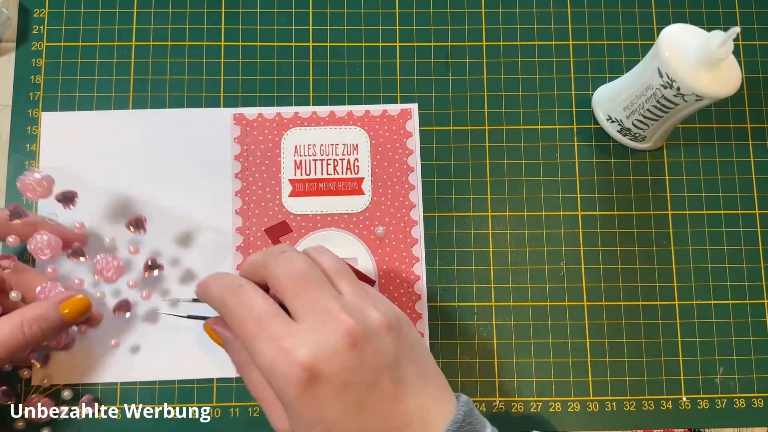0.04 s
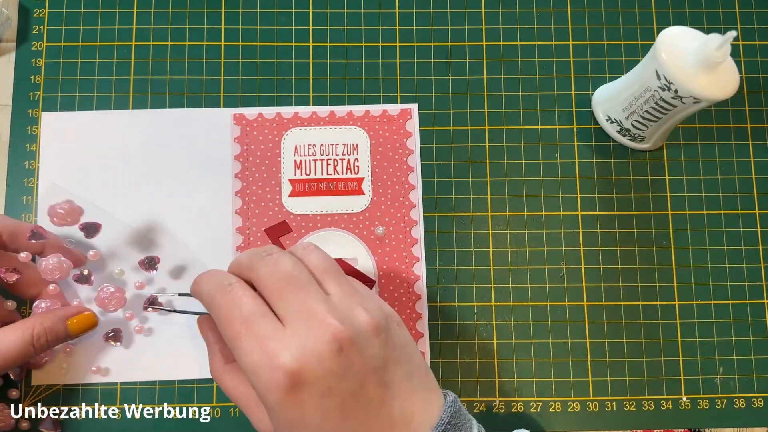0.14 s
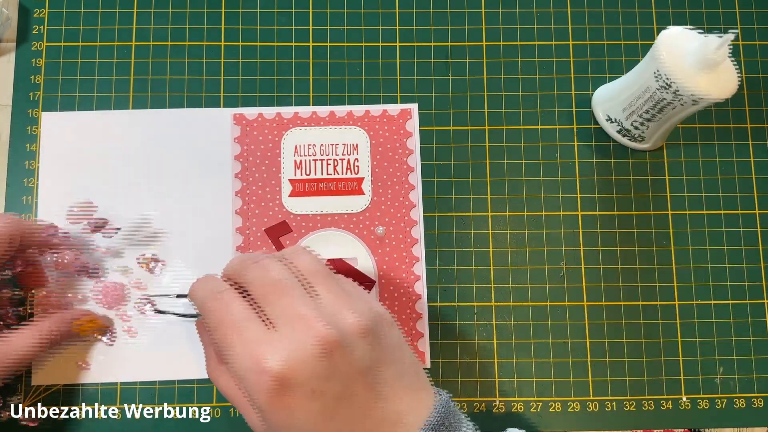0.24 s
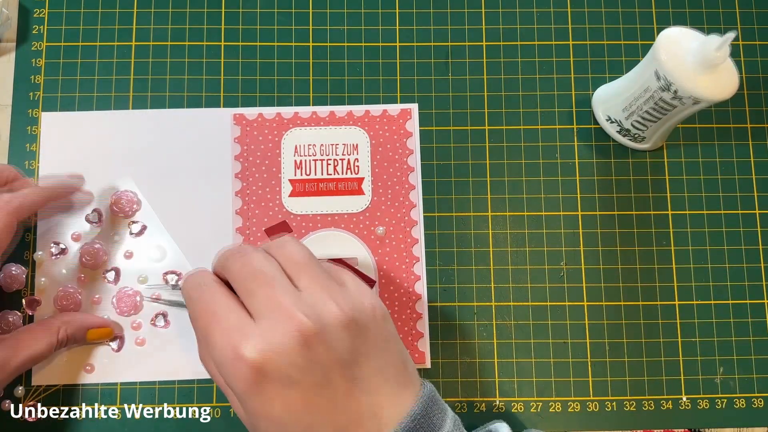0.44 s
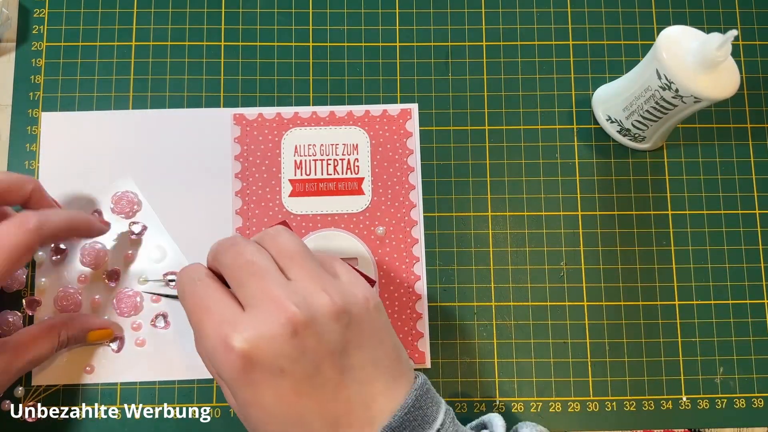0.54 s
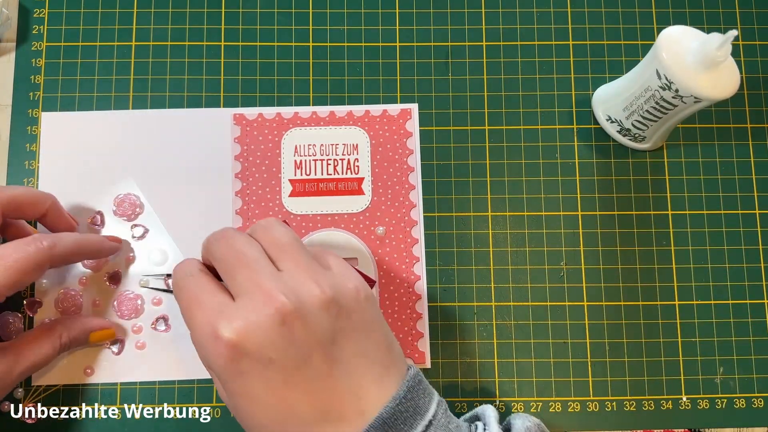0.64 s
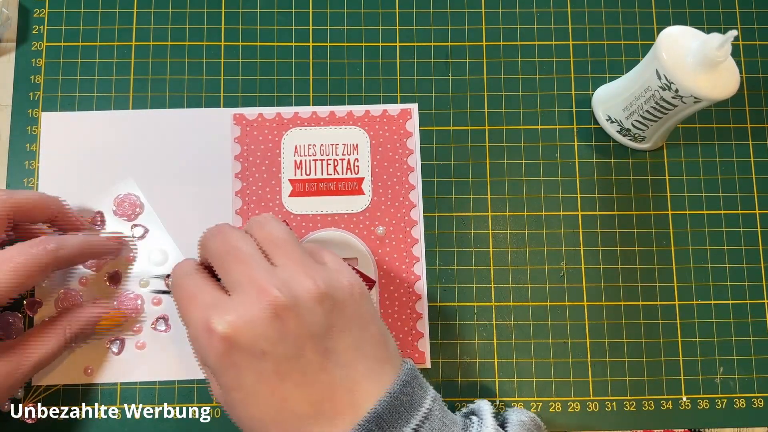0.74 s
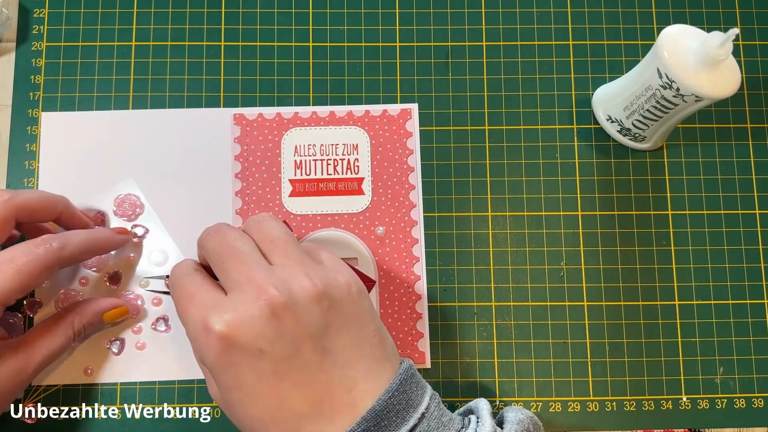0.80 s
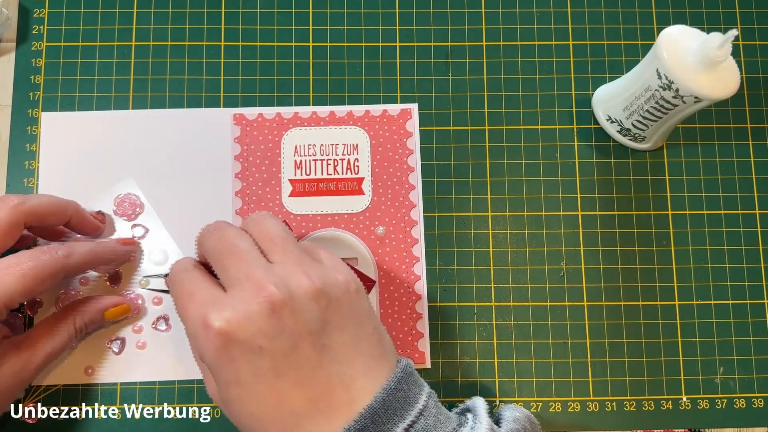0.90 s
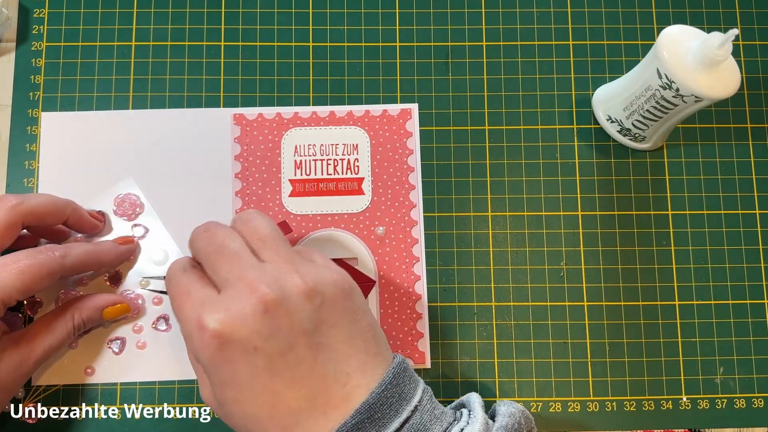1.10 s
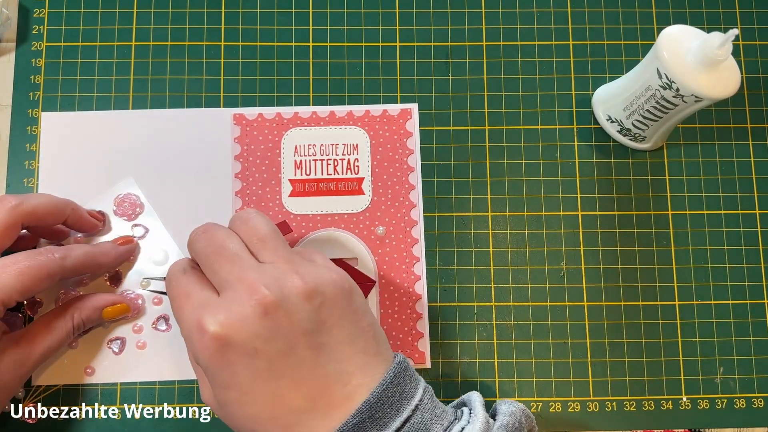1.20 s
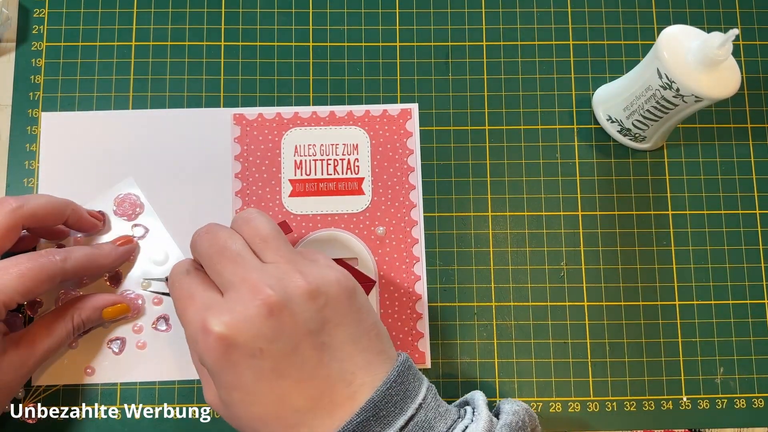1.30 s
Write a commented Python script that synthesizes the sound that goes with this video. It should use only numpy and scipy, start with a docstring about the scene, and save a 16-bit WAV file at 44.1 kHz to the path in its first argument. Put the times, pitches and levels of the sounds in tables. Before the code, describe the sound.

Stiff plastic sheet rattles, pops sharply and slaps down on a card, then near quiet

```python
"""A swish opens: a stiff plastic sheet of adhesive gems slides over a card, as slips with a rattle and hiss.
It buckles with hollow pops (crunch, ringing modes, low thump) and lands with a bright crackling slap.
Steel tweezers then tick faintly, as tiny slip clusters; fingers rub the sheet through single resonances.
Hands bump the table in low noise bursts; a small room echoes the near sounds over a steady low rumble."""
import sys
import numpy as np
from scipy import signal
from scipy.fft import rfft, irfft, next_fast_len
from scipy.io import wavfile

SR = 44100
rng = np.random.default_rng(int(sys.argv[2]) if len(sys.argv) > 2 else 0)


def materialize(psi):
    """Save the field psi as 16-bit PCM at rate SR to the path in sys.argv[1].

    A 1-D psi becomes a single channel; in a 2-D psi each row is a channel.
    """
    bounded = np.clip(np.atleast_2d(psi).T, -1, 1)
    quanta = np.round(bounded * 32767).astype(np.int16)
    wavfile.write(sys.argv[1], SR, quanta)


N = 59535


def amp(db):
    """Decibels to gain."""
    return 10 ** (np.asarray(db) / 20)


def unit(x):
    """Scaled to rms 1."""
    return x / np.sqrt(np.mean(x ** 2) + 1e-20)


def noise():
    """Two unrelated streams of white noise."""
    return rng.standard_normal((2, N))


def along(points, hz):
    """Table of (frequency, value) read on a log frequency axis."""
    f, v = np.transpose(points)
    return np.interp(np.log(hz + 1), np.log(f + 1), v)


def filtered(x, response):
    """x through a complex frequency response."""
    m = next_fast_len(N + SR // 2)
    return irfft(rfft(x, m) * response(np.fft.rfftfreq(m, 1 / SR)), m)[..., :N]


def coloured(x, spectrum, tilt_db_per_octave=0):
    """x shaped by a spectrum and a tilt about 2 kHz, keeping the power of white noise."""
    def response(hz):
        octaves = np.clip(np.log2((hz + 1) / 2000), -2, 1)
        return unit(amp(along(spectrum, hz) + tilt_db_per_octave * octaves))
    return filtered(x, response)


# left-right likeness of close sounds, room echo and room tone: (frequency [Hz], correlation [-1..1])
NEAR_LIKENESS = [(150, 1), (320, 0.98), (480, .6), (680, 0.52), (900, 0.83), (1500, 1), (3000, 0.92),
                 (7000, .88), (15000, 0.86)]
ROOM_LIKENESS = [(130, 0.98), (290, .8), (600, 0.18), (1400, 0.67), (3100, 0.7), (7000, 0.3), (15000, .7)]
AIR_LIKENESS = [(60, 0.93), (130, 1), (290, 0.64), (640, 0.042), (1410, 0.44), (3100, .65), (6800, .5),
                (15000, .7)]


def spread(pair, likeness):
    """Two unrelated signals, mixed as mid and side into left and right of the given likeness."""
    def mid_side(hz):
        angle = np.arccos(np.clip(along(likeness, hz), -1, 1)) / 2
        return np.array([np.cos(angle), np.sin(angle)])
    mid, side = filtered(pair, mid_side)
    return np.array([mid + side, mid - side])


SLIPS_PER_S, SLIP_SPREAD_DB = 9000, 4


def slips(per_s=SLIPS_PER_S):
    """Stick-slip friction: two random streams of tiny impulses of uneven size and sign, at rms 1."""
    hit = rng.random((2, N)) < per_s / SR
    sign = np.sign(noise())
    return unit(hit * sign * amp(SLIP_SPREAD_DB * noise()))


ROUNDNESS = 1.4  # exponent of an envelope's top: 1 pointed, 2 bell


def burst(x, s, swell_s, fade_s):
    """x swells up to time s and fades; its energy depends on the envelope alone."""
    t = np.arange(N) / SR - s
    shape = np.exp(-np.abs(t / np.where(t < 0, swell_s, fade_s)) ** ROUNDNESS)
    return np.array([unit(c * shape) for c in x]) * np.sqrt(np.mean(shape ** 2))


def ring(modes, s, swell_s):
    """Sheet modes at random phases swell up to time s, then decay exponentially."""
    t = np.arange(N) / SR - s
    tones = 0
    for hz, db, t60_s in modes:
        decay = amp(db - 60 * np.maximum(t, 0) / t60_s)
        tones = tones + decay * np.sin(2 * np.pi * hz * t + rng.normal(0, 0.94))
    return tones * np.exp(-np.abs(np.minimum(t, 0) / swell_s) ** ROUNDNESS) / 2


# sheet buckles: (time [s], level [dB], swell [s], fade [s], treble tilt [dB/octave],
#                 thump [dB], pitch that rings most [Hz])
POPS = [(0.0773, -27.5, 0.00077, 0.0025, 1.5, -24.5, 2400),
        (0.236, -13, 0.00034, 0.0027, 14.5, -16.5, 2480), (0.2565, -6.5, 0.002, .0034, 0.5, -14.5, 1722),
        (0.3017, -20.5, .0005, .006, 2.5, -11.5, 3294)]
# modes of the buckling sheet: (frequency [Hz], level [dB], t60 [s])
BENT_SHEET_MODES = [(1211, -9, 0.13), (1558, -1, 0.037), (1885, 4.5, 0.024), (2270, -6, 0.026),
                    (2980, -2.5, 0.026), (3163, -4, 0.019), (3660, -6, .025), (4310, -3, 0.025),
                    (5670, -7.5, .025)]
# spectrum of crunch and rattle, then of the thump: (frequency [Hz], density [dB/Hz])
CRUNCH_SPECTRUM = [(180, -44), (300, -18.5), (961, -16.5), (1900, -6), (2610, -9), (2930, -17.5),
                   (3350, -26.5), (4090, -12.5), (4670, -25.5), (5250, -19), (10400, -35.5), (16000, -37)]
THUMP_SPECTRUM = [(40, -24.5), (110, 1.5), (200, -0.5), (300, -3.5), (430, 3), (560, -13), (700, -2),
                  (900, -12), (1300, -17.5)]
RING_DB, CRUNCH_DB, FOCUS_DB_PER_OCTAVE = 1.5, -1.5, 11.5  # focus: mode loss away from the pitch
THUMP_DELAY_S, THUMP_FADE_S = 0.0027, 0.018


def pops():
    """Each buckle is a crunch of slips, a short ring of the sheet and a push of air."""
    out = np.zeros((2, N))
    for s, db, swell_s, fade_s, tilt, thump_db, pitch_hz in POPS:
        modes = [(hz, level_db - FOCUS_DB_PER_OCTAVE * abs(np.log2(hz / pitch_hz)), t60_s)
                 for hz, level_db, t60_s in BENT_SHEET_MODES]
        crunch = coloured(burst(slips(), s, swell_s, fade_s), CRUNCH_SPECTRUM, tilt)
        thump = burst(coloured(noise(), THUMP_SPECTRUM), s + THUMP_DELAY_S, swell_s, THUMP_FADE_S)
        body = spread(amp(CRUNCH_DB) * crunch + amp(thump_db) * thump, NEAR_LIKENESS)
        out += amp(db) * (amp(RING_DB) * ring(modes, s, swell_s) + body)
    return out


# sheet meets card: (time [s], level [dB], swell [s], fade [s], ring relative to level [dB])
TAPS = [(0.1714, -34, .001, 0.0055, -19), (0.2333, -26.5, 0.00054, .001, -19.5),
        (0.373, -32.5, 0.00039, 0.0021, -24.5), (0.387, -37.5, .001, 0.0041, -15),
        (0.4062, -12, 0.0047, 0.003, -6.5), (0.4103, -18.5, .0003, 0.00062, -22.5)]
# slap spectrum: (frequency [Hz], density [dB/Hz])
TAP_SPECTRUM = [(100, -16), (330, -1.5), (470, -4.5), (680, -21), (850, -10), (1300, -3), (1950, -11),
                (2300, -0.5), (2800, -14.5), (4400, -0.5), (5900, 1), (7600, -5), (11500, -19),
                (14500, -18.5), (16000, -17)]
# modes of the sheet lying flat: (frequency [Hz], level [dB], t60 [s])
FLAT_SHEET_MODES = [(883, -4, 0.018), (1534, 0, 0.028), (2253, -2.5, 0.025), (3210, -1, 0.031),
                    (3933, -2, 0.023), (4537, 4, .035)]


def taps():
    """Bright slaps: a tight cluster of slips and a brief ring of the flat sheet."""
    clusters, rings = 0, 0
    for s, db, swell_s, fade_s, ring_db in TAPS:
        clusters = clusters + amp(db) * burst(slips(), s, swell_s, fade_s)
        rings = rings + amp(db + ring_db) * ring(FLAT_SHEET_MODES, s, swell_s)
    return spread(coloured(clusters, TAP_SPECTRUM), NEAR_LIKENESS) + rings


# sliding over the card: (time [s], level [dB], hiss relative to level [dB])
SLIDE = [(0, -37, -5), (.03, -35.5, -6), (.065, -46, -3), (.10, -45.5, -11), (.135, -53, -3.5),
         (.160, -43, -4), (0.167, -41.5, -9), (.172, -41.5, 7.5), (0.207, -45, 13), (.225, -43.5, 1),
         (0.288, -28.5, -16.5), (0.337, -43, -2), (.385, -41.5, -11.5), (.445, -41.5, -3), (.49, -55, -6.5),
         (0.561, -64.5, -32), (0.699, -83, -4.5)]
# spectra of dull scrape and bright hiss: (frequency [Hz], density [dB/Hz])
SCRAPE_SPECTRUM = [(120, -7), (200, -2), (500, -0.5), (720, -9), (1000, -4), (2400, -5), (4000, -15),
                   (7800, -17.5), (11500, -37), (14500, -27), (16000, -28)]
HISS_SPECTRUM = [(400, -11.5), (880, -28), (2000, -4.5), (2900, -5.5), (6700, -6.5), (10000, -10.5),
                 (12000, -25), (14500, -16), (16000, -21)]
RATTLES_PER_S, RATTLE_DB = 320, -7  # gems jostling on the sheet


def slide():
    """Plastic rubs on card: dense slips as dull scrape and varying hiss, sparse ones as rattle."""
    s, *columns = np.transpose(SLIDE)
    level_db, hiss_db = [np.interp(np.arange(N) / SR, s, c) for c in columns]
    scrape = coloured(slips(), SCRAPE_SPECTRUM)
    rattle = amp(RATTLE_DB) * coloured(slips(RATTLES_PER_S), CRUNCH_SPECTRUM)
    hiss = amp(hiss_db) * coloured(slips(), HISS_SPECTRUM)
    return amp(level_db) * spread(scrape + rattle + hiss, NEAR_LIKENESS)


# tweezer tips on the gems: (time [s], level [dB])
TICKS = [(.767, -60.5), (.809, -55), (.822, -64.5), (.958, -68.5)]
# tick spectrum: (frequency [Hz], density [dB/Hz])
TICK_SPECTRUM = [(2000, -34), (4300, -7), (5500, 0), (6500, -8), (7600, -9), (10000, -18.5), (16000, -25.5)]
TICK_SWELL_S, TICK_FADE_S = 0.0008, 0.0013


def tweezers():
    """Tiny, thin ticks of the steel tips: very short slip clusters."""
    ticks = sum(amp(db) * burst(slips(), s, TICK_SWELL_S, TICK_FADE_S) for s, db in TICKS)
    return spread(coloured(ticks, TICK_SPECTRUM), NEAR_LIKENESS)


# fingers on the sheet: (time [s], level [dB], swell [s], fade [s], resonance [Hz])
RUBS = [(.589, -55.5, 0.0058, 0.0054, 1827), (.63, -63.5, 0.0833, 0.13, 1810),
        (.81, -67.5, 0.069, 0.043, 2220), (.95, -64.5, 0.087, 0.033, 2100), (1.065, -68, 0.018, .03, 2048),
        (1.28, -66, .025, 0.025, 2011), (1.285, -61.5, 0.024, 0.017, 860)]
RUB_Q = 8.9


def fingers():
    """Faint rubs: slips, each burst through one band-pass resonance of the held sheet."""
    def resonant(hz):
        def response(f):
            damping = 1j * f * hz / RUB_Q
            return damping / (hz * hz - f * f + damping)
        return filtered(slips(), response)
    rubs = sum(amp(db) * burst(resonant(hz), s, swell_s, fade_s) for s, db, swell_s, fade_s, hz in RUBS)
    return spread(rubs, ROOM_LIKENESS)


# table gives under the hands: (time [s], level [dB], swell [s], fade [s])
BUMPS = [(.19, -44, 0.018, 0.025), (.313, -39, .012, 0.01), (0.422, -38, 0.011, .025),
         (0.586, -44.5, 0.071, 0.048), (0.643, -41, 0.0089, 0.0082), (0.729, -42, 0.011, 0.02),
         (.92, -43.5, 0.014, 0.015), (0.974, -44.5, 0.044, 0.029), (1.151, -44, 0.013, 0.041),
         (1.29, -44.5, 0.023, 0.031)]
# table spectrum: (frequency [Hz], density [dB/Hz])
TABLE_SPECTRUM = [(30, -16), (60, -13), (120, 1.5), (200, 7.5), (300, -12), (700, -54.5)]


def bumps():
    """Soft low knocks of the hands on the table: bursts of low noise."""
    knocks = sum(amp(db) * burst(coloured(noise(), TABLE_SPECTRUM), s, swell_s, fade_s)
                 for s, db, swell_s, fade_s in BUMPS)
    return spread(knocks, AIR_LIKENESS)


# reverberation: (frequency [Hz], t60 [s])
ROOM_T60_S = [(150, 1), (500, 0.15), (2000, .42), (5000, .36), (12000, .25)]
TAIL_DB, EARLY_DB, EARLY_FADE_S = -20, -12.5, 0.0094
WALL_S = 0.0038  # echo fades in from half this delay to all of it


def room(x):
    """Dense near reflections, then a tail whose bass lasts longest."""
    hz, t, z = signal.stft(noise(), SR, nperseg=256)
    decay = amp(-60 * t / along(ROOM_T60_S, hz)[:, None])
    tail = signal.istft(z * decay, SR, nperseg=256)[1][:, :N]
    t = np.arange(N) / SR
    early = noise() * np.exp(-t / EARLY_FADE_S)
    onset = np.clip(2 * t / WALL_S - 1, 0, 1)
    answer = (amp(TAIL_DB) * unit(tail * onset) + amp(EARLY_DB) * unit(early * onset)) / np.sqrt(N)
    return signal.fftconvolve(x.mean(0)[None], spread(answer, ROOM_LIKENESS), axes=1)[:, :N]


# room tone: (frequency [Hz], density [dB/Hz])
AIR_SPECTRUM = [(25, -31.5), (45, -11.5), (65, -3), (95, -7), (125, -0.5), (200, 0.5), (260, -11.5),
                (330, -13.5), (520, -17.5), (750, -23), (1400, -32), (2200, -32.5), (4000, -37),
                (6500, -38.5), (10000, -47.5), (12000, -54), (16000, -55.5)]
AIR_DB = -49


def air():
    """Steady room rumble under a faint hiss: shaped noise."""
    return amp(AIR_DB) * spread(unit(coloured(noise(), AIR_SPECTRUM)), AIR_LIKENESS)


def scene():
    """The handling on the table, its echo and the room tone."""
    near = pops() + taps() + slide() + tweezers()
    return near + room(near) + fingers() + bumps() + air()


# microphone ports: (frequency [Hz], left minus right [dB]), (frequency [Hz], left phase lag [rad])
BALANCE_DB = [(60, 1), (150, 0), (380, 3), (950, 0.0), (2380, -0.5), (5980, 0.0), (15000, 0.0)]
LAG_RAD = [(100, 0), (4500, 0), (6400, .7), (8200, 1.8), (11000, 3), (16000, 4.6)]
PEAK, KNEE = 1.05, 5  # soft limit, sharpness of its bend
LOW_CUT_HZ, TOP_HZ = 33, 16000


def record(dry):
    """Two close ports differ in level and treble phase; peaks are rounded, deep bass and top cut."""
    side = np.array([[.5], [-.5]])  # each port takes half the difference

    def port_response(hz):
        return amp(side * along(BALANCE_DB, hz)) * np.exp(-1j * side * along(LAG_RAD, hz))

    def band(hz):
        return (hz < TOP_HZ) * hz ** 2 / np.hypot(hz ** 2, LOW_CUT_HZ ** 2)

    ports = filtered(dry, port_response)
    rounded = ports / (1 + np.abs(ports / PEAK) ** KNEE) ** (1 / KNEE)
    return filtered(rounded, band)


dry = scene()
out = record(dry)
materialize(out)
```